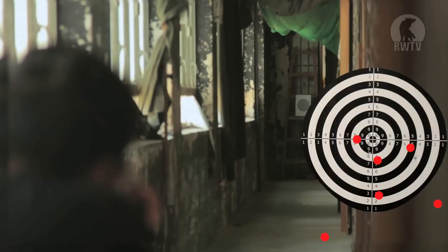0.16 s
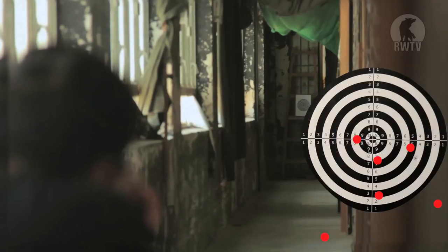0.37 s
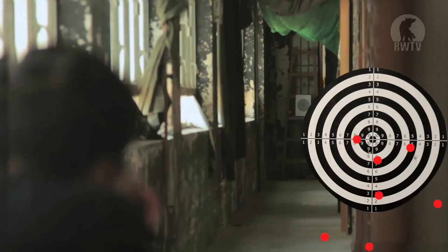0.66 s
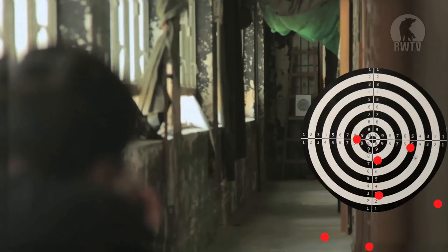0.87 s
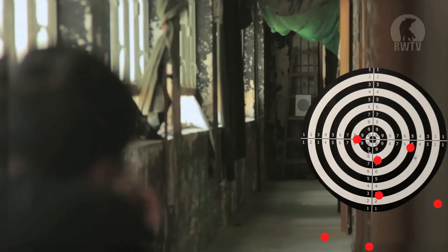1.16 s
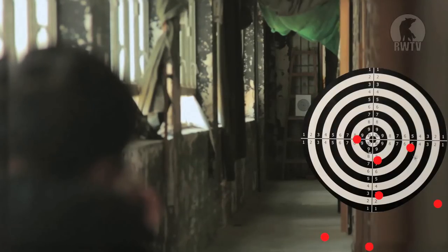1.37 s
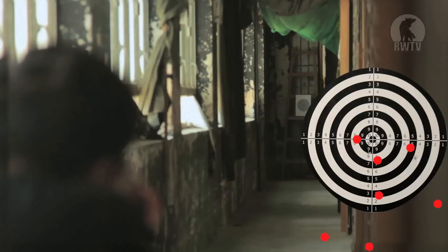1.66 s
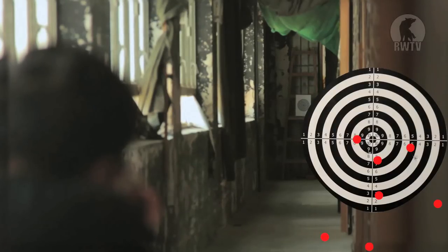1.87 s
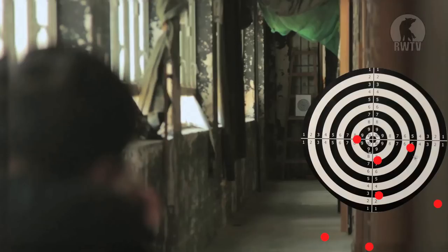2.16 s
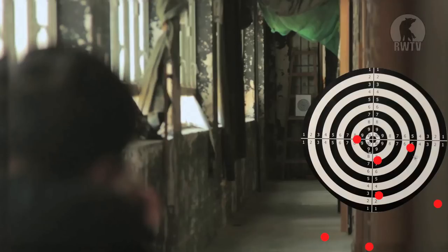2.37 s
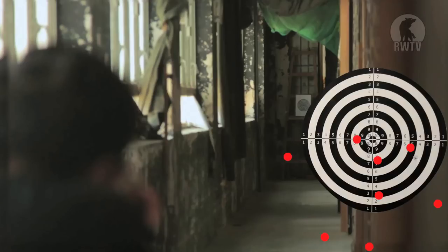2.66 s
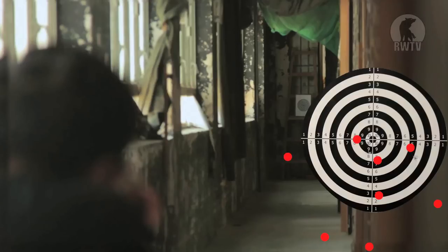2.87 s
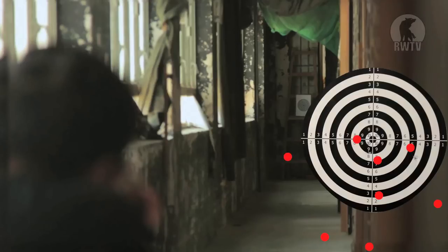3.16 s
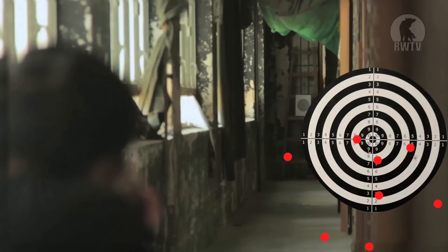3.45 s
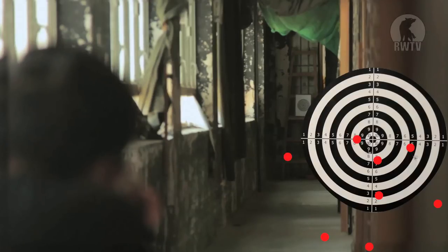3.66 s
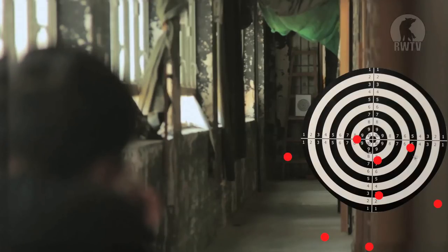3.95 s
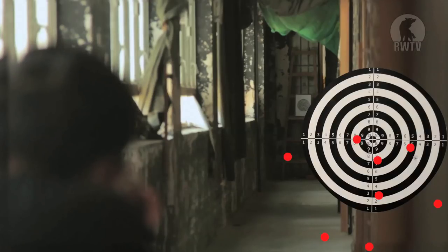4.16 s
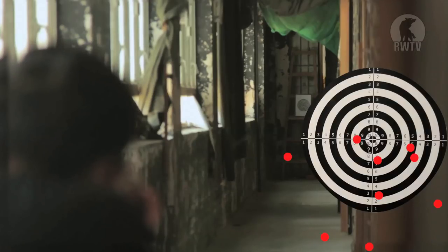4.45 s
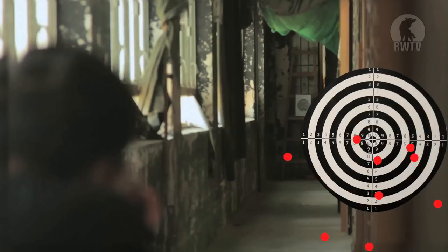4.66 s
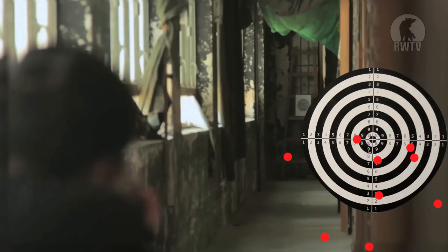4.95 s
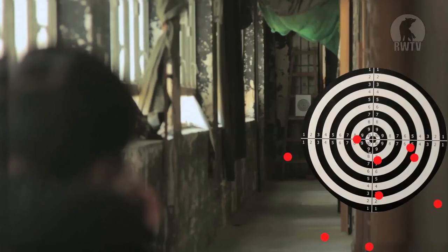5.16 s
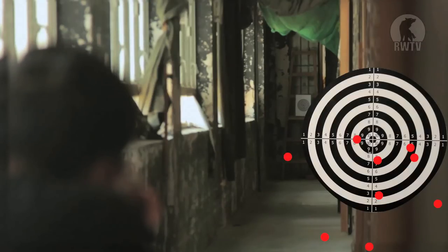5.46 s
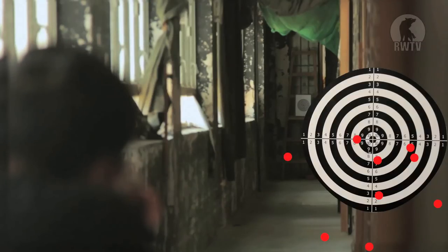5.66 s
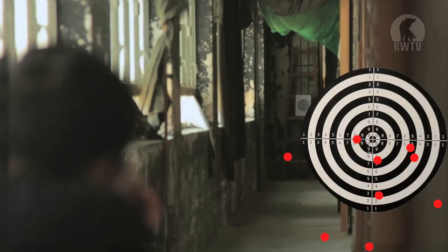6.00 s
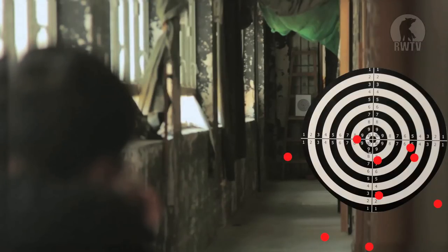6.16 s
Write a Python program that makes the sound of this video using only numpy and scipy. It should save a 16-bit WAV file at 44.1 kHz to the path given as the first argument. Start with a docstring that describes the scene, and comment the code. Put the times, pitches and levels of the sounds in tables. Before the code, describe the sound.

In a long indoor shooting range with faint low room noise, a nearby electric airsoft gun shoots three times at an even, unhurried pace. Every shot joins a short motor whine, a hard piston crack with a pop of air, and a hollow trigger clack. The walls ring briefly, and after each shot a much softer click comes back from the pellet striking far away.

```python
"""In a long concrete shooting range, an electric airsoft gun fires three single shots close by.
In each, the motor winds the gears up, the piston slams home, air pops from the muzzle, the gears run
down and the trigger clacks back; half a second later the pellet strikes the far end of the range.
Meshing teeth give a gliding whine; impacts give noise bursts and excite damped modes. The walls
reverberate over a faint murmur. The motor just kicks in for a fourth shot as the sound ends."""
import sys
import numpy as np
from scipy import signal
from scipy.fft import rfft, irfft, next_fast_len
from scipy.io import wavfile
from scipy.ndimage import uniform_filter1d

SR = 44100
rng = np.random.default_rng(int(sys.argv[2]) if len(sys.argv) > 2 else 0)


def write(x):
    x = np.atleast_2d(x).T
    wavfile.write(sys.argv[1], SR, np.round(np.clip(x, -1, 1) * 32767).astype(np.int16))


N = 279153
TIME = np.arange(SR // 2) / SR  # time axis of one event [s]

# spectrum of the range's murmur: (frequency [Hz], relative level [dB])
MURMUR_SPECTRUM = [(12, -55.5), (20, -23), (32, -18), (49, -10), (106, 1), (126, -12), (245, -6.5),
                   (298, -11), (404, -11), (519, -14), (631, -17), (1100, -26), (1200, -23), (1630, -29.5),
                   (15500, -42)]
# reverberation times of the nearby walls, the hall and its far end: (frequency [Hz], T60 [s])
BOOTH_T60 = [(100, 0.41), (350, 0.51), (1000, 0.31), (4000, 0.15), (12000, 0.17)]
HALL_T60 = [(80, 0.79), (300, 2.3), (800, 1.2), (2000, .64), (4500, .57), (8000, .46), (15000, .34)]
FAR_T60 = [(200, 1.5), (1000, 1.5), (2000, .62), (6000, 0.39), (11000, 0.42), (16000, .28)]
# colour of the same three reverberant fields: (frequency [Hz], gain [dB])
BOOTH_COLOUR = [(60, -9.5), (170, -9), (240, 3.5), (350, 0), (750, -5), (1500, -2.5), (4000, 0),
                (12000, -6)]
HALL_COLOUR = [(40, -7), (110, 0.5), (160, -3), (300, 3.5), (700, -8), (1500, -4), (4300, -2.5), (6000, -2),
               (15000, -11)]
FAR_COLOUR = [(60, -2), (220, 10), (600, 2.5), (1050, 1.5), (1500, -3.5), (2500, -2.5), (7000, -5),
              (11000, -9.5), (16000, -15)]

# faint ticks down the range: (time [s], level [dB], treble gain [dB])
TICKS = [(1.3949, -64.5, -4), (3.8691, -60.5, -16), (5.5982, -56.5, 1.5)]
# spectra of a tick, the pellet's knock and its bright crack: (frequency [Hz], relative level [dB])
TICK_SPECTRUM = [(500, -16.5), (1700, -1.5), (3000, 0.5), (4200, -8), (5300, 1), (6800, -11), (9300, -0.5),
                 (12500, -3), (16000, -9)]
KNOCK_SPECTRUM = [(40, -4.5), (200, -4), (700, -7), (1200, -13), (1700, -4.5), (2800, -9), (5000, -15),
                  (7000, -30), (12000, -19), (16000, -11)]
CRACK_SPECTRUM = [(200, -18), (1500, -5.5), (4500, -7), (7000, -11), (8300, -7.5), (10000, -1), (12500, -3),
                  (16000, -10)]

# trigger returns: (time [s], click level [dB], body ring gain [dB], loss per bounce [dB])
TRIGGER_RETURNS = [(0.6594, -11, -12, 11), (2.6523, -10.5, -11, 11.5), (4.5851, -12.5, -14, 18.5)]
# spectrum of the trigger's click: (frequency [Hz], relative level [dB])
CLICK_SPECTRUM = [(40, -12.5), (150, -15.5), (320, 7), (800, 7.5), (1400, -6), (2000, -1), (3500, -5),
                  (5500, -16), (8500, -11), (12000, -14), (16000, -22.5)]
# modes of the hollow plastic body: (frequency [Hz], relative level [dB], T60 [s])
BODY_MODES = [(239, -19, 0.25), (290.3, -17.5, .33), (321, -0.5, .04), (349, -21, 0.23),
              (474.5, -16.5, 0.36), (752, -13, 0.13), (932, -16.5, 0.1), (1116.4, -12.5, 0.0405),
              (1880, -9, .025), (2210, -16, 0.028), (2660, -11.5, 0.024)]

# three shots, and a fourth of which only the motor's start falls before the end:
# (slam time [s], motor kick level [dB], pellet flight time [s], relative strike level [dB])
SHOTS = [(0.546, -29, 0.48, 1), (2.541, -20.5, 0.48, 0), (4.4814, -21, .4770, 1), (6.3750, -33.5, .477, 0)]
# spectra of motor kick, tooth rasp, spring and piston slam: (frequency [Hz], relative level [dB])
KICK_SPECTRUM = [(60, -9.5), (170, -3), (330, 2.5), (1200, -4.5), (2000, 3), (2900, -12), (3800, -7.5),
                 (5500, -16), (16000, -22.5)]
RASP_SPECTRUM = [(150, -23.5), (380, -9), (490, 6), (640, -6), (1050, -0.5), (1350, -7), (2000, -0.5),
                 (3000, 2), (4400, -1.5), (5800, -7.5), (8200, -1), (11000, -2), (16000, -8)]
SPRING_SPECTRUM = [(40, -12), (130, -4.5), (370, -8.5), (490, 4), (640, -4.5), (1000, -1), (1400, -6.5),
                   (1950, 1), (2900, -6.5), (3600, -1.5), (4400, -0.5), (5400, -10.5), (16000, -22)]
SLAM_SPECTRUM = [(30, -10), (100, -5), (170, -3.5), (420, 5), (750, -2.5), (1100, 2), (1600, -4),
                 (2500, -2.5), (3000, -7), (3600, 1), (4400, 0), (5200, -12), (7000, -7.5), (16000, -21.5)]
# gear case resonances that the whine sweeps through: (frequency [Hz], bandwidth [Hz], peak gain [dB])
CASE_RESONANCES = [(1000, 150, -17.5), (1980, 110, -19)]
# the gears jolt their shell: (time from the slam [s], gain [dB])
JOLTS = [(-.048, -28), (.009, -30), (.035, -22)]
# the spring shudders: (time from the slam [s], level [dB], T60 [s])
REBOUNDS = [(0.015, -21, 0.065), (0.0341, -21.5, 0.12)]
# modes of gearbox shell, cylinder head and whole gun: (frequency [Hz], relative level [dB], T60 [s])
SHELL_MODES = [(203, -12, 0.18), (290.3, -8, .2), (470, -1, 0.21), (488, -5, 0.064), (764, -7.5, .2),
               (990, -11, 0.11), (1947, -11.5, 0.08)]
CYLINDER_MODES = [(3950, -0.5, 0.0037), (3494, -18, 0.056), (4300, -20.5, 0.041)]
RECOIL_MODES = [(95, 0.5, 0.088), (136, -3.5, 0.13)]

LEAD_S, RELEASE_S = 0.0525, 0.0074  # the motor starts, and the piston is let go, this long before the slam
COAST_S = 0.1  # the gears stop this long after it


def amp(db):
    """Amplitude ratio of a level in decibels."""
    return 10 ** (np.asarray(db) / 20)


def unit(x):
    """Normalisation to an rms of 1."""
    return x / np.sqrt(np.mean(x ** 2) + 1e-20)


def along(points, hz):
    """Interpolation of (frequency [Hz], value) points on a logarithmic frequency axis."""
    frequencies, values = np.transpose(points)
    return np.interp(np.log(hz + 1), np.log(frequencies + 1), values)


def tinted(x, spectrum):
    """Linear filtering by a curve of (frequency [Hz], gain [dB]) points."""
    size = next_fast_len(len(x))
    gain = amp(along(spectrum, np.fft.rfftfreq(size, 1 / SR)))
    return irfft(rfft(x, size) * gain, size)[:len(x)]


def noise(spectrum, size=len(TIME)):
    """Spectral shaping of white noise, at an rms of 1."""
    return unit(tinted(rng.standard_normal(size), spectrum))


def add(track, start, sound):
    """Superposition of a sound on the track from a start time [s]."""
    part = track[max(round(start * SR), 0):][:len(sound)]
    part += sound[:len(part)]


def envelope(rise, hold, t60):
    """Exponential decay after a linear rise and a hold, all in seconds."""
    return np.minimum(TIME / rise, 1) * amp(-60 * np.maximum(TIME - rise - hold, 0) / t60)


def burst(spectrum, rise, hold, t60):
    """Impact noise: a brief contact spreads its energy over a broad band."""
    return noise(spectrum) * envelope(rise, hold, t60)


def ring(modes, rise, scatter_db):
    """Free vibration: a sum of damped modes whose levels vary from strike to strike."""
    return sum(amp(db + scatter_db * rng.normal()) * envelope(rise, 0, t60)
               * np.sin(2 * np.pi * hz * TIME) for hz, db, t60 in modes)


def murmur():
    """Ambient noise: the empty range is a stationary source, strongest in the bass."""
    return amp(-63) * noise(MURMUR_SPECTRUM, size=N)


def reverberation(x, t60s, colour, build_s):
    """Diffuse field: the energy in each band builds up, then decays exponentially with random phase."""
    hz, t, bands = signal.stft(x, SR, nperseg=384)
    t = t[t < 1.5]
    decay = (amp(-60 * t / along(t60s, hz)[:, None]) * (1 - np.exp(-t / build_s))) ** 2
    decay /= decay.sum(axis=1, keepdims=True)
    energy = signal.fftconvolve(abs(bands) ** 2, decay, axes=1)[:, :bands.shape[1]]
    grain = signal.stft(rng.standard_normal(N), SR, nperseg=384)[2]
    field = signal.istft(grain / grain.std() * np.sqrt(abs(energy)), SR, nperseg=384)[1][:N]
    return tinted(field, colour)


def distant_ticks():
    """Faint transients down the range, each filtered to its own brightness."""
    out = np.zeros(N)
    for start, db, treble_db in TICKS:
        tick = burst(TICK_SPECTRUM, 0.0011, 0.002, 0.05)
        add(out, start, amp(db) * tinted(tick, [(3000, 0), (7000, treble_db)]))
    return out


def pellet_strikes(crack_s=0.0075, echo_s=0.0315):
    """Time of flight delays the pellet's knock on the target; a brighter crack and its echo follow."""
    out = np.zeros(N)
    for slam, _, flight, db in SHOTS:
        hit = slam + flight
        add(out, hit, amp(db - 35) * burst(KNOCK_SPECTRUM, 0.0001, 0.0034, 0.019))
        add(out, hit + crack_s, amp(db - 37) * burst(CRACK_SPECTRUM, 0.00082, 0.004, 0.076))
        add(out, hit + echo_s, amp(db - 43.5) * burst(CRACK_SPECTRUM, 0.0014, 0.003, 0.041))
    return out


def trigger_clacks(contacts=3, first_bounce_s=0.0235, bounce_ratio=0.6):
    """Inelastic bouncing: the trigger lands ever sooner and softer, ringing the hollow body."""
    out = np.zeros(N)
    for contact, click_db, body_db, loss_db in TRIGGER_RETURNS:
        for k in range(contacts):
            click = burst(CLICK_SPECTRUM, 0.002, 0.00078, 0.022)
            body = ring(BODY_MODES, rise=0.0028, scatter_db=2.5)
            add(out, contact, amp(click_db - k * loss_db) * click)
            add(out, contact + 0.001, amp(body_db - k * loss_db) * body)
            contact += first_bounce_s * bounce_ratio ** k
    add(out, 0.7275, amp(-32) * burst(TICK_SPECTRUM, 0.0008, 0.00083, 0.0095))  # a loose part clicks once
    return out


def tooth_rate(t, limit_hz=2332, spin_up_s=0.0175, run_down_s=0.059):
    """Mesh frequency [Hz] at time t from the slam: a logistic spin-up, then a logistic run-down."""
    spin_up = 1 + np.exp(-(t + LEAD_S - spin_up_s) / 0.0092)
    run_down = 1 + np.exp((t - run_down_s) / 0.017)
    return limit_hz / (spin_up * run_down)


def gears(jitter=0.065, bite=0.46, tilt_db_per_octave=-7, shaft_teeth=14, knee_hz=1140):
    """Forced vibration: meshing teeth rasp, and their whine flares as it crosses the case resonances."""
    t = TIME - LEAD_S
    tooth_hz = tooth_rate(t)
    case_response = sum(amp(db) * tooth_hz * width / (hz ** 2 - tooth_hz ** 2 + 1j * tooth_hz * width)
                        for hz, width, db in CASE_RESONANCES)
    whine_gain = abs(case_response) * amp(-3 * (t > -RELEASE_S))  # unloaded gears whine less
    force = (tooth_hz / knee_hz) ** 2.5
    strain_db = np.select([t < -RELEASE_S, t < 0], [2, -3])  # spring being wound; piston in flight
    rasp_gain = amp(-25 + strain_db) * force / np.hypot(1, force)  # levels off above the knee
    unsteadiness = unit(uniform_filter1d(rng.standard_normal(len(TIME)), size=30))
    phase = 2 * np.pi * np.cumsum(tooth_hz * (1 + jitter * unsteadiness)) / SR
    harmonics = np.arange(1, 6)[:, None]
    whine = np.sum(amp(tilt_db_per_octave * np.log2(harmonics)) * np.sin(harmonics * phase), axis=0)
    scrapes = (1 + bite * np.cos(phase)) / np.sqrt(1 + bite ** 2 / 2)  # one for each tooth
    rasp = noise(RASP_SPECTRUM) * scrapes
    load = amp(np.sin(phase / shaft_teeth))  # the mesh tightens once a turn, by 1 dB
    return load * (whine_gain * whine + rasp_gain * rasp) * (t < COAST_S)


def muzzle_pop(rest_hz=750, lift_hz=300, settle_s=0.00038):
    """Air column resonance: the barrel rings, and its pitch sags as the pressure escapes."""
    hz = rest_hz + lift_hz * np.exp(-TIME / settle_s)
    return np.sin(2 * np.pi * np.cumsum(hz) / SR) * envelope(0.0012, 0.0016, 0.018)


def piston_slam():
    """Impulsive excitation: the piston lands with a crack and rings the cylinder head."""
    head = amp(2.5) * ring(CYLINDER_MODES, rise=0.00037, scatter_db=0.8)
    crack = amp(-10) * burst(SLAM_SPECTRUM, 0.00021, 0.0029, 0.042)
    return head + crack


def gun():
    """Stored elastic energy: the motor winds a spring whose release drives the piston, shaking the gun."""
    out = np.zeros(N)
    for slam, kick_db, _, _ in SHOTS:
        add(out, slam - LEAD_S, amp(kick_db) * burst(KICK_SPECTRUM, 0.0016, 0.001, 0.02))
        add(out, slam - LEAD_S, gears())
        add(out, slam, piston_slam())
        add(out, slam - 0.002, amp(-24.5) * ring(RECOIL_MODES, rise=0.0015, scatter_db=3.5))
        add(out, slam + 0.0021, muzzle_pop())
        for delay, db, t60 in REBOUNDS:
            add(out, slam + delay, amp(db) * burst(SPRING_SPECTRUM, 0.00089, 0.002, t60))
        for delay, db in JOLTS:
            add(out, slam + delay, amp(db) * ring(SHELL_MODES, rise=0.0046, scatter_db=2))
    return out


def scene():
    """The direct-to-reverberant ratio conveys distance: the gun is fairly dry, the target echoes."""
    shots, clacks = gun(), trigger_clacks()
    downrange = pellet_strikes() + distant_ticks()
    booth = reverberation(amp(-9.5) * shots + amp(-11.5) * clacks, BOOTH_T60, BOOTH_COLOUR, 0.015)
    hall = reverberation(amp(-20.5) * shots + amp(-21.5) * clacks, HALL_T60, HALL_COLOUR, 0.031)
    far_end = reverberation(downrange, FAR_T60, FAR_COLOUR, 0.0074)
    return (murmur() + far_end + hall + booth + downrange + clacks + shots)[None]


def record(dry, top_hz=16300, taper_hz=800):
    """Clipping and band limiting: peaks are cut at full scale, then the highest treble is removed."""
    size = next_fast_len(N + SR // 2)
    low_pass = np.clip((top_hz - np.fft.rfftfreq(size, 1 / SR)) / taper_hz, 0, 1) ** 2
    clipped = np.clip(dry, -1, 1)
    return irfft(rfft(clipped, size) * low_pass, size)[..., :N]


dry = scene()
out = record(dry)
write(out)
```